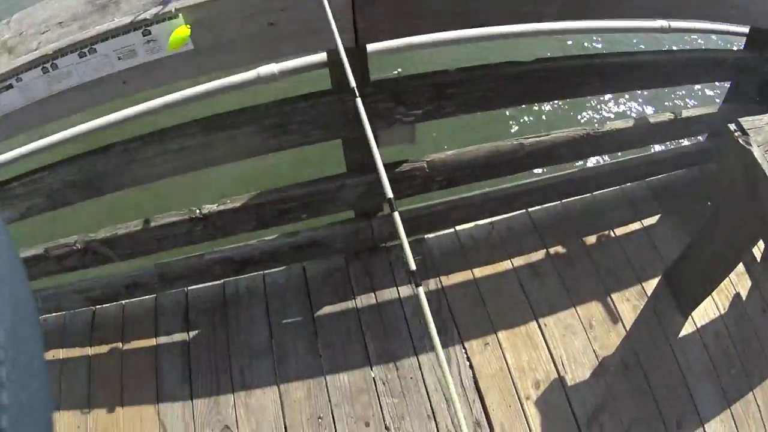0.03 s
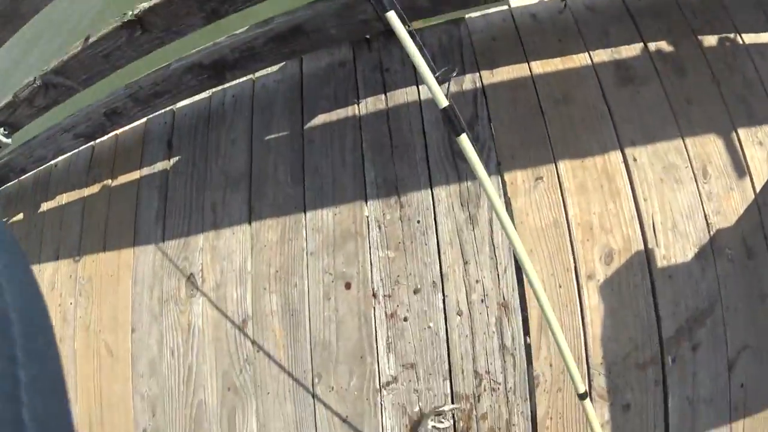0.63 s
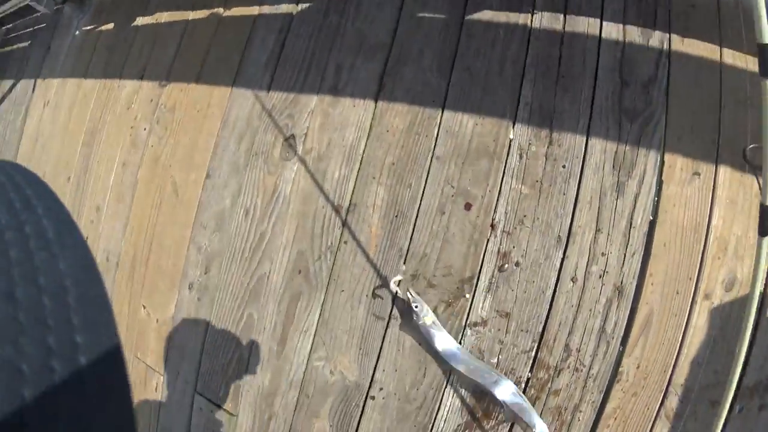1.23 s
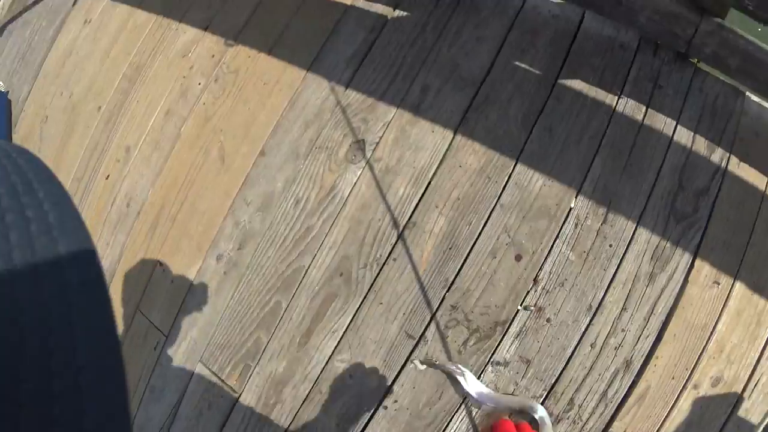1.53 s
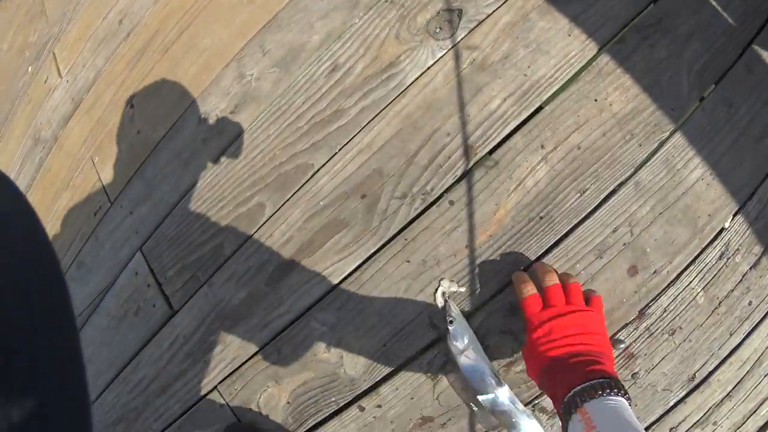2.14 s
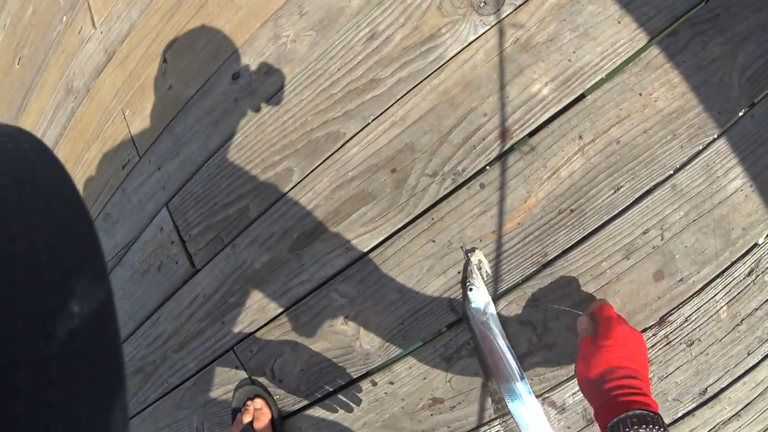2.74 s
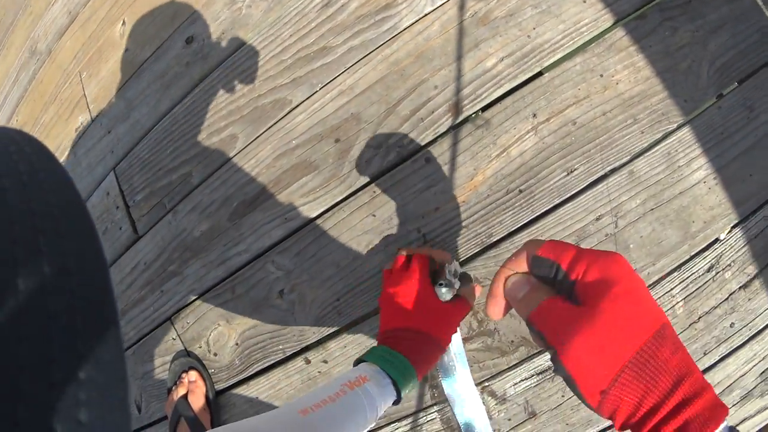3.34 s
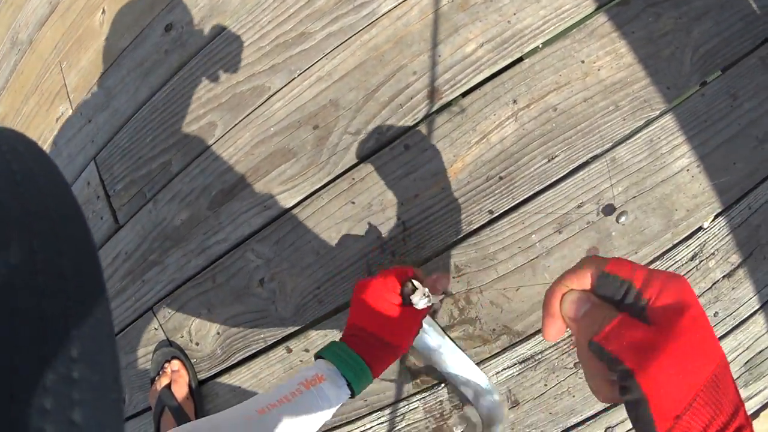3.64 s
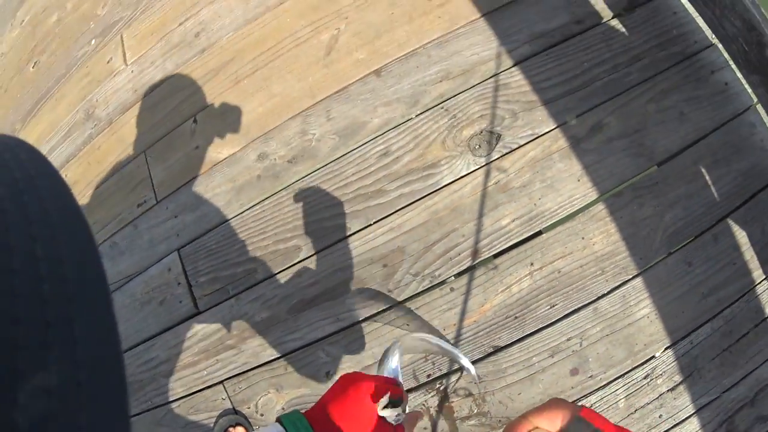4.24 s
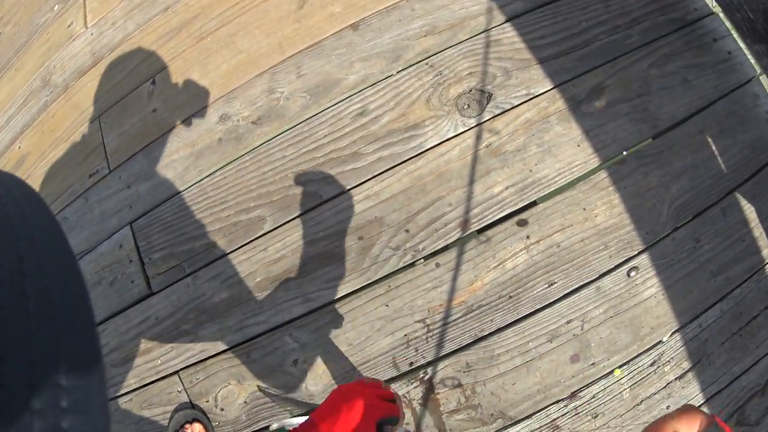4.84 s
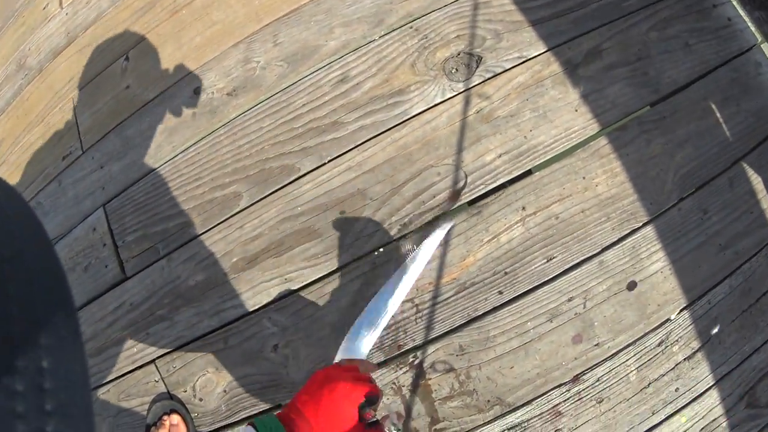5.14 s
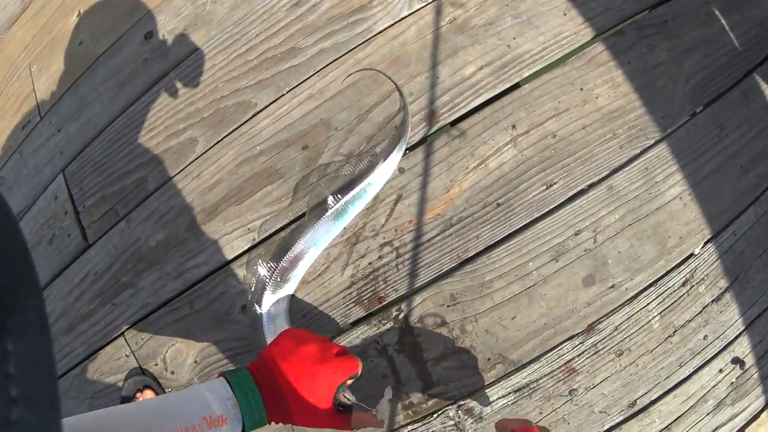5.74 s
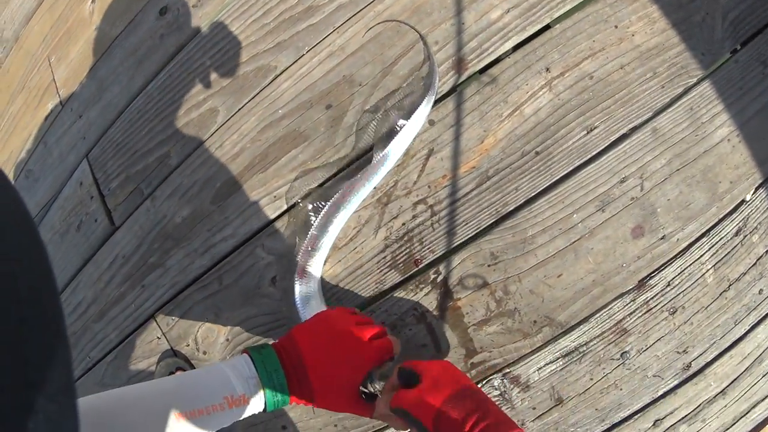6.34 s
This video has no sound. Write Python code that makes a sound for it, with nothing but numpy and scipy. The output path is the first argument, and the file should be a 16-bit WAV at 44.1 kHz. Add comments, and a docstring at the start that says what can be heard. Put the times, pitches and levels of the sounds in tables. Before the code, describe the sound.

On a wooden pier, a fishing rod scrapes the rail and clacks with a short, hollow ring while a wet fish slides and knocks on the planks. Feet thud on the boards, then metal pliers click at the hook among more slaps, small wet ticks and a few tackle clacks. Everything is close to a body-worn microphone, with shuffling clothes, light wind rumble and a soft wash of sea underneath.

```python
"""On a wooden pier, a long fish is landed close to a body-worn microphone. The wet fish slides, ticks and slaps
on the planks, and feet thud: each blow bends a board. The wearer's body bumps deeply as it moves. Rod and
tackle scrape the rail and clack, and the microphone's case rings briefly and hollowly; pliers click at the
hook. Underneath, clothes shuffle, light wind buffets the microphone and the sea washes."""
import sys
import numpy as np
from scipy import signal
from scipy.fft import rfft, irfft
from scipy.io import wavfile
from scipy.ndimage import uniform_filter1d

SR = 44100
rng = np.random.default_rng(int(sys.argv[2]) if len(sys.argv) > 2 else 0)


def file_out(sig):
    """Save sig as 16-bit WAV at sys.argv[1]."""
    # one column per channel
    cols = np.atleast_2d(sig).T
    # limit, then scale
    lim = np.clip(cols, -1, 1)
    pcm = np.round(lim * 32767).astype(np.int16)
    wavfile.write(sys.argv[1], SR, pcm)


N = 290178
TOP_HZ = 11130  # upper limit of the treble


# Hollow knocks on the planks: t/s, peak level/dB, f/Hz
KNOCKS = [(0.1002, -31, 490), (0.2447, -17.5, 503), (0.2858, -24.5, 573), (0.3649, -27, 523),
          (0.425, -24.5, 365), (0.48, -25.5, 537), (0.499, -20, 540), (0.6033, -25.5, 567),
          (0.7027, -27, 670), (0.907, -23.5, 546), (0.996, -28.5, 556), (1.1274, -27.5, 510),
          (1.8468, -25, 620), (1.8883, -30, 580), (1.9885, -25, 670), (2.0192, -24.5, 620),
          (2.1089, -29, 513), (2.2802, -27.5, 643), (2.4735, -19.5, 590), (2.4811, -21, 563),
          (2.8282, -26.5, 497), (3.2429, -27, 510), (3.4166, -28, 523), (3.633, -29, 520),
          (3.7044, -21.5, 600), (3.7635, -26.5, 650), (4.204, -34, 700), (5.4479, -30, 513),
          (5.4897, -26.5, 613), (5.596, -31.5, 490), (5.654, -31.5, 630), (5.9378, -29.5, 533),
          (6.0565, -28, 610)]
# Heavy, soft blows of feet and fish, and deep bumps of the wearer's body moving: t/s, peak level/dB, f/Hz
THUDS = [(0.241, -34.5, 185), (0.356, -28, 27.2), (0.4982, -28.5, 143), (0.721, -28.5, 145),
         (0.7896, -29.5, 229), (1.432, -37.5, 94), (1.8484, -24.5, 160), (1.988, -26.5, 152),
         (2.022, -33.5, 156), (2.2685, -30.5, 88), (2.2753, -21, 154), (2.446, -29, 31), (2.451, -27.5, 70),
         (2.4714, -20.5, 112), (2.4751, -15.5, 193), (3.712, -25, 258), (4.2248, -28, 138),
         (5.1188, -26.5, 288), (6.532, -28, 278)]

def planks():
    """Light knocks and heavy thuds bend the boards, and the wearer's body bumps deeply as it moves; the harder
    the knock, the more it cracks."""
    out = np.zeros((2, N))
    for s, db, hz in KNOCKS + fish_patter():
        crack_db = -7 + 0.81 * (db + 16)
        knock = bend(hz, rise_cycles=1.58, glide=0.17, grit_db=crack_db,
                     hum_hz=0.66 * hz, hum_db=-4.5, hum_t60=0.055)
        add(out, s, gain_of(db) * panned(-1.5) * knock)
    for s, db, hz in THUDS:
        thud = bend(hz, rise_cycles=0.99, glide=0.58, grit_db=-17.5, hum_hz=hz, hum_db=-5, hum_t60=0.12)
        add(out, s, gain_of(db) * panned(-1) * thud)
    return out


def bend(hz, rise_cycles, glide, grit_db, hum_hz, hum_db, hum_t60):
    """In a bending plank high notes arrive first, so the pulse falls in pitch; then the deck hums."""
    t = np.arange(8000) / SR
    age = t * hz / rise_cycles  # 1 at the peak
    swell = (age * np.exp(1 - age)) ** 3
    pitch = hz * (1 + glide * (np.exp(1 - age) - 1) / (np.e - 1))
    grit = gain_of(grit_db) * noise_band(len(t), 1300, width_hz=800, apart=0.25)
    tone = np.sin(2 * np.pi * (np.cumsum(pitch) / SR + rng.uniform(-0.1, 0.15)))
    hum = noise_band(len(t), hum_hz, width_hz=hz / 2, apart=0.65)
    return swell * (tone + grit) + hum * gain_of(hum_db) * fade(t, hum_t60) * (1 - np.exp(-age))


def fish_patter(db=-38, hz=600):
    """The shifting fish knocks faintly at random; gives rows like those of KNOCKS."""
    return [(s, db, hz * 2 ** (0.13 * rng.standard_normal())) for s in busy_times(per_s=9, eagerness=3)]


# Tone of rubbing on wood: f/Hz, level/dB
RUB_TONE = [(180, -24), (300, -16.5), (536, -9), (578, -10), (663, -23.5), (860, -12.5), (1380, 5),
            (1930, 2), (3340, -3), (3660, -4.5), (4600, 3.5), (7060, -9.5), (9870, -9.5), (11000, -12),
            (11500, -55), (15000, -60), (22000, -120)]

def sliding(level_db=-1, catches_per_s=700, patchy_db=2.5, smooth_above_db=-43.5):
    """Fish, line and gloves rub: a fine hiss with tiny catches that come in clumps."""
    clumps = gain_of(6 * np.tanh(wobble(N, 700)))
    catches = clumps * (rng.random(N) < catches_per_s / SR)
    catches *= gain_of(4 * np.minimum(rng.exponential(1, N), 3))
    rub_db, _ = strokes(np.arange(N) / SR)
    slowness = 1 / (1 + gain_of(rub_db - smooth_above_db) ** 2)  # a fast slide smooths the catches out
    hiss = stereo_noise(N, 0.36)
    grains = unit_level(catches * stereo_noise(N, 0.75))
    friction = unit_level(hiss + 0.62 * slowness * grains)
    hz, t, spectrum = signal.stft(friction, SR, nperseg=256, noverlap=192)
    rub_db, brightness = strokes(t)
    octaves = np.log2(np.clip(hz, 1200, 11000) / 3500)[:, None]
    tone = gain_of(at_pitch(RUB_TONE, hz)[:, None] + octaves * brightness)
    tone /= np.sqrt(np.mean(tone ** 2, 0))
    spectrum *= tone * gain_of(rub_db + level_db + patchy_db * patches(tone.shape, 12, 7))
    return signal.istft(spectrum, SR, nperseg=256, noverlap=192)[1][:, :N]


# Single slides: fastest at t/s, level/dB, rise/s, fall/s, brightness/(dB per octave)
STROKES = [(0.0, -36, .01, 0.039, -5.5), (0.5, -31.5, 0.082, 0.051, -2.5), (0.63, -26, 0.11, 0.1, 3.3),
           (1.18, -42, 0.15, 0.071, 2.5), (1.87, -52, 0.033, 0.042, 2), (2.05, -38.5, 0.024, 0.035, -6),
           (2.203, -35, 0.015, 0.025, 0), (2.51, -42, 0.03, 0.1, 5), (2.33, -48, 0.027, 0.093, -4),
           (3.4, -43, 0.028, 0.077, -1), (3.61, -38, 0.023, 0.031, 1.5), (3.905, -36, 0.021, .02, 2.5),
           (4.34, -40.5, 0.021, .03, 1), (4.47, -36.5, 0.011, 0.017, -1),
           (6.476, -28.5, 0.0078, 0.041, 0.2), (6.57, -28, 0.033, .05, 0)]
# How busy hands and fish are: t/s, level/dB
HANDLING = [(0, -50), (0.3, -47), (0.95, -45.5), (2.1, -46.5), (2.6, -48), (2.75, -52.5), (3.3, -51.5),
            (3.55, -46.5), (4.1, -48.5), (4.4, -44), (4.7, -47.5), (5.13, -47), (5.27, -52), (6.58, -55)]

def strokes(t):
    """Level and brightness of the rubbing: each slide swells and fades over the soft handling."""
    power = gain_of(at_time(HANDLING, t)) ** 2
    tilt = -2 * power  # handling is duller by 2 dB per octave
    for s, db, rise_s, fall_s, brightness in STROKES:
        away = abs(t - s) / np.where(t < s, rise_s, fall_s)
        stroke = (gain_of(db) * np.exp(-away ** 1.63)) ** 2  # between a point and a bell in shape
        power += stroke
        tilt += stroke * brightness
    return 10 * np.log10(power), tilt / power


def busy_times(per_s, eagerness, busy_db=-46):
    """Random moments, more of them when the handling is busy; per_s is the rate at busy_db."""
    step_s = 0.001
    t = np.arange(0, N / SR, step_s)
    rate = per_s * gain_of(eagerness * (at_time(HANDLING, t) - busy_db))
    return t[rng.random(len(t)) < step_s * rate]


# The clearest ticks of fish skin on the boards: t/s, treble level/dB
WET_TICKS = [(0.8936, -39), (0.924, -33.5), (0.9324, -38), (0.9685, -36), (1.035, -34.5), (1.2423, -38),
             (1.2734, -36.5), (1.4065, -39), (1.6904, -35), (1.7034, -37.5), (1.8358, -39.5), (2.3497, -41),
             (3.7626, -31.5), (3.9148, -29), (4.211, -38), (4.699, -41.5), (5.0274, -38), (5.7996, -39.5)]

def wet_ticks():
    """Wet skin ticks as it moves: a few clear, bright ticks among many faint ones."""
    out = np.zeros((2, N))
    faint = [(s, at_time(HANDLING, s) - 3.5 + 3.5 * rng.standard_normal())
             for s in busy_times(per_s=24, eagerness=2.6)]
    for s, db in WET_TICKS + faint:
        hz = min(9280 * 2 ** (0.19 * rng.standard_normal()), TOP_HZ)
        add_contact(out, s, (db - 12.5, db - 6, db), hz, t60=0.015, scuff_s=0.00036)
    return out


# Hard blows that set the microphone's case ringing: t/s, level/dB, centre f/Hz, snap/dB added to level, ring
# length factor
CLACKS = [(0.8088, -19, 2600, -28, 2.7), (0.8221, -20.5, 2220, -23, 0.91), (0.8757, -22.5, 1540, -16, 0.84),
          (0.9393, -23, 1760, -8, 0.95), (1.008, -31.5, 1440, -19, 1.1), (1.662, -26, 1930, -46, 0.71),
          (3.518, -18.5, 1670, -10, 0.76), (3.598, -25, 1330, -5.5, 0.47), (4.1258, -31, 1410, -24, 0.45),
          (5.1093, -25, 1900, 0, 1.2), (5.7707, -16, 1790, -22, 1.18), (5.8639, -26.5, 1790, -25, 0.73),
          (5.8921, -32, 1680, -21, 1.1), (6.524, -28, 1500, -17, 3.2)]
# The notes the microphone's case rings with after those blows: f/Hz, relative level/dB, fade time/s before the
# length factor
CLACK_NOTES = [(1213, -4, 0.068), (1252, 3, 0.095), (1421, 3.5, 0.061), (1505, 3.5, 0.029),
               (1724, 5.5, 0.032), (2110, -8, 0.013), (2046, 3.5, 0.058), (2477, 16, 0.013),
               (2630, 1, 0.0091), (3100, 2.5, 0.024), (4200, 22, 0.016)]

def tackle_clacks(ring_db=-1, reach_octaves=0.34, rise_s=0.000085, detune=0.018):
    """Rod and tackle clack: each blow gives a dry snap and sets the microphone's case ringing shortly and
    hollowly near the blow's own pitch."""
    out, t = np.zeros((2, N)), np.arange(6000) / SR
    snap_band = signal.butter(2, (900, 5500), "band", fs=SR, output="sos")
    snap = signal.sosfilt(snap_band, snap_pulse())
    hz, note_db, t60 = np.transpose(CLACK_NOTES)[:, :, None]
    for s, db, centre_hz, snap_db, length in CLACKS:
        spot, mistune = rng.standard_normal((2, len(hz), 1))
        nearness = np.exp(-0.5 * (np.log2(hz / centre_hz) / reach_octaves) ** 2)
        strength = nearness * gain_of(note_db + 4 * spot)  # each spot favours other notes
        phase = rng.uniform(0, 2 * np.pi, hz.shape) + 0.47 * rng.standard_normal((2, len(hz), 1))
        notes = np.sin(2 * np.pi * hz * (1 + detune * mistune) * t + phase)
        ring = (strength * fade(t, t60 * length) * notes).sum(1) * (1 - np.exp(-t / rise_s))
        add(out, s, hit_level(ring, db + ring_db))
        add(out, s, hit_level(crack(t, snap, t60=0.037, scuff_s=rise_s), db + snap_db))
    return out


# Short scrapes on wood: t/s, middle level/dB, hold/s, body/dB and treble/dB added to level, ring f/Hz
SCRAPES = [(0.1442, -19.5, 0.0078, -7.5, -13, 4100), (0.157, -25, 0.0052, -1, -20, 4230),
           (0.18, -27.5, 0.002, -10, -19, 4300), (0.291, -38, 0.0032, 5.5, -5, 2950),
           (0.3092, -25, 0.0031, 0, -28, 4180), (0.347, -33.5, 0.0061, 0, -18, 3950),
           (0.3844, -27.5, 0.0029, -11, -20, 3800), (0.399, -28.5, 0.0029, -6, -19, 3440),
           (0.414, -29, 0.0021, 3, -16, 2840), (0.474, -37.5, .022, 2, -20, 2400),
           (0.603, -26.5, 0.028, -4, -26, 3500), (0.719, -37, 0.021, 7, -18, 2620),
           (0.788, -31.5, 0.0025, 3.5, -7, 2560), (0.8085, -24, 0.0055, -10, -5, 2610),
           (0.821, -25, 0.025, 0, -12, 2580), (1.651, -46, .012, 12, -16, 1960),
           (3.551, -29.5, 0.0038, -2, -7, 2700), (3.699, -34.5, .022, 3.5, -8.5, 4570),
           (3.7983, -28, 0.001, -25, -12, 5230), (4.307, -31, 0.0047, -12, -21, 4630),
           (6.51, -24.5, 0.016, -0.5, -0.5, 4730)]

def scrapes(rise_s=0.00023, band_t60s=(0.078, 0.043, 0.036)):
    """A hard edge bites, judders over the grain for a moment, and lets the wood ring out."""
    out, t, snap = np.zeros((2, N)), np.arange(6000) / SR, snap_pulse()
    for s, db, hold_s, body_db, treble_db, hz in SCRAPES:
        judder = gain_of(3 * np.tanh(wobble(len(t), 50)))
        for band, band_db in enumerate((db + body_db, db, db + treble_db)):
            shape = (1 - np.exp(-t / rise_s)) * fade(np.maximum(t - hold_s, 0), band_t60s[band])
            rasp = signal.fftconvolve(stereo_noise(len(t), 0.42) * judder * shape, snap[None])
            add(out, s, ringing_band(rasp, band, hz, band_db))
    return out * panned(-0.5)


# Metal clicks: t/s, middle level/dB, body/dB and treble/dB added to level, middle fade/s, ring f/Hz
CLICKS = [(0.1232, -28.5, -1, -3.5, 0.075, 4570), (0.1647, -30, -6, -1.5, 0.038, 4430),
          (0.8682, -38, 2, 4.5, 0.049, 2630), (0.9566, -39.5, -9, 5, 0.014, 4870),
          (1.0903, -31.5, -4, 1.5, .012, 10700), (1.161, -40, -10, -2, .035, 4650),
          (1.221, -27.5, -11, -20, 0.016, 4700), (1.3655, -31.5, -6.5, -7.5, 0.035, 3600),
          (1.4982, -37, -3.5, -15, .028, 4520), (1.6238, -37.5, -4, -11, 0.034, 6300),
          (1.8013, -28, -3, -8.5, 0.023, 3730), (2.0045, -29.5, -32, -16, 0.0076, 4500),
          (2.4827, -30, -0.5, -15, 0.024, 3300), (3.592, -33, 2.5, -3, 0.048, 3640),
          (3.598, -32, -13, -14, 0.016, 4130), (3.611, -35, -5, 2.5, 0.013, 10700),
          (3.8125, -34, -27, -21, .013, 4730), (3.9947, -35, -15, -11, 0.041, 3490),
          (4.0038, -34, -9, 0.5, 0.049, 4720), (4.0326, -33, -14, -2, 0.026, 10600),
          (4.1182, -31.5, -4, -14, 0.018, 3100), (4.1236, -21.5, -12.5, -9, 0.03, 5050),
          (4.1456, -33.5, -17, -4, 0.034, 4630), (4.2392, -34, -13, -5.5, 0.018, 4070),
          (4.557, -23, -19, -16, 0.019, 6100), (4.5722, -33, -2, -4, 0.039, 3150),
          (4.7672, -42, 3, -3, 0.041, 4900), (4.8, -36.5, 0, 0.5, .06, 4930),
          (4.9221, -33.5, -4.5, 1.5, .023, 4730), (5.0246, -43.5, 0, 2, 0.023, 3000),
          (5.1098, -25.5, -2, -4.5, 0.026, 3370), (5.7555, -43, -3, 1, 0.01, 3880),
          (5.7691, -30, 7, -29, 0.043, 3970), (5.863, -44, 13.5, -20, 0.033, 2900),
          (6.495, -33, -9, -1, 0.018, 5200)]

def plier_clicks():
    """Pliers and hook catch and snap, each click with its own share of body and treble."""
    out = np.zeros((2, N))
    for s, db, body_db, treble_db, t60, hz in CLICKS:
        add_contact(out, s, (db + body_db, db, db + treble_db), hz, t60, scuff_s=0.0005)
    return out


def add_contact(mix, s, levels_db, hz, t60, scuff_s):
    """Adds a small, sharp contact at time s; its body rings longer than its treble."""
    t, snap = np.arange(-512, 4096) / SR, snap_pulse()
    for band, length in enumerate((2.17, 1, 0.84)):
        sound = crack(t, snap, t60 * length, scuff_s)
        add(mix, s + t[0], ringing_band(sound, band, hz, levels_db[band]))


def crack(t, snap, t60, scuff_s):
    """A scuff builds up, catches at t = 0, rings out and scatters faintly off deck and rail."""
    after = np.maximum(t, 0)
    scuff = np.exp(np.minimum(t, 0) / scuff_s)
    catch = gain_of(3) * np.exp(-after / 0.0012)
    scatter = gain_of(-28) * fade(after, 0.1)
    shape = np.where(t < 0, scuff, catch + fade(after, t60) + scatter)
    return signal.fftconvolve(stereo_noise(len(t), 0.19) * shape, snap[None])[:, :len(t)]


# Tone of a click: f/Hz, level/dB
SNAP_TONE = [(500, -11), (900, -17.5), (1300, -6.5), (1700, -1), (2100, -4), (2700, -3), (3400, -4.5),
             (4500, 0.5), (5200, -1), (6100, 0.5), (7000, -10), (8200, -5.5), (9300, -5), (11000, -4.5)]

def snap_pulse():
    """The quickest pulse that has the tone of a click (a minimum-phase filter)."""
    hz = abs(np.fft.fftfreq(1024, 1 / SR))
    log_gain = np.log(gain_of(at_pitch(SNAP_TONE, hz)))
    return np.fft.ifft(np.exp(np.conj(signal.hilbert(log_gain)))).real


# Borders of the body, middle and treble bands: f/Hz
BAND_EDGES = [520, 2600, 6500, 11300]

def ringing_band(sound, band, hz, db):
    """Body (0), middle (1) or treble (2) of a contact, with one note of the part that was touched."""
    passband = signal.butter(3, BAND_EDGES[band:band + 2], "band", fs=SR, output="sos")
    ring = gain_of(6) * resonate(sound, hz, width_hz=330)
    return hit_level(signal.sosfilt(passband, sound + ring), db)


# Loudness of the shuffling: t/s, level/dB
SHUFFLE_LEVEL = [(0.0, -48.5), (0.38, -45.5), (1.5, -50), (1.96, -51), (3.06, -55.5), (3.63, -50),
                 (6.41, -52.5), (6.58, -54)]
# Its dull tone: f/Hz, level/dB
SHUFFLE_TONE = [(60, -4), (110, -1.5), (170, 0), (260, -2.5), (400, -4.5), (600, -9), (800, -12),
                (1200, -37)]

def shuffle():
    """Clothes and deck shift with a low, dull noise."""
    noise = with_tone(stereo_noise(N, 0.18), SHUFFLE_TONE + [(4000, -66)])
    return noise * gain_of(at_time(SHUFFLE_LEVEL, np.arange(N) / SR))


# Rise and fall of the wind: t/s, level/dB before the boost
WIND_LEVEL = [(0.0, -52), (0.29, -44), (0.42, -54), (2.09, -56.5), (2.44, -51), (2.91, -62.5), (4.0, -50.5),
              (4.84, -52.5), (5.39, -75), (6.58, -63)]
# Its deep tone: f/Hz, level/dB
WIND_TONE = [(12, -8.5), (28, 1.5), (45, 1), (70, -25), (120, -13), (300, -65)]

def wind(gust_db=4, boost_db=5.5):
    """Gusts buffet the microphone and make it rumble."""
    gusts = gain_of(gust_db * np.tanh(wobble(N, 3000)))
    rumble = with_tone(stereo_noise(N, 0.14) * gusts, WIND_TONE + [(2000, -90)])
    return rumble * gain_of(at_time(WIND_LEVEL, np.arange(N) / SR) + boost_db)


# Tone of the sea: f/Hz, level/dB
SEA_TONE = [(410, -4), (700, -11), (834, -10), (885, -11), (1170, -1.5), (1520, -7.5), (1630, -1.5),
            (1720, -6.5), (2230, -9), (3360, -22.5), (5250, -25), (6790, -26), (10500, -27), (11100, -34),
            (11500, -57), (15000, -79), (22000, -120)]
# How alike its two sides are: f/Hz, likeness (1 = the same)
SEA_LIKENESS = [(60, 0.98), (130, 0.86), (270, 0.65), (580, 0.053), (1220, 0.73), (2600, 0.093),
                (5520, 0.13), (11700, 0.34)]
# Which way it leans: f/Hz, left minus right/dB
SEA_SIDE = [(60, -0.5), (170, -2.0), (500, 1.5), (1420, 0.3), (4090, 4), (11700, -0.5)]

def sea(level_db=-48, patchy_db=2.5):
    """Water under the pier makes a steady wash with soft, drifting patches."""
    hz, _, (left, other) = signal.stft(rng.standard_normal((2, N)), SR, nperseg=1024, noverlap=768)
    likeness = at_pitch(SEA_LIKENESS, hz)[:, None]
    right = likeness * left + np.sqrt(1 - likeness ** 2) * other
    lean = gain_of(at_pitch(SEA_SIDE, hz)[:, None] / 2)
    tone = gain_of(at_pitch(SEA_TONE, hz)[:, None] + patchy_db * patches(left.shape, 20, 20))
    spectrum = np.array([left * lean, right / lean]) * tone
    wash = signal.istft(spectrum, SR, nperseg=1024, noverlap=768)[1][:, :N]
    return gain_of(level_db) * unit_level(wash)


def gain_of(db):
    """Turns decibels into a factor."""
    return 10 ** (np.asarray(db) / 20)


def fade(t, t60):
    """Dies away by 60 dB in t60 seconds, the fade time."""
    return gain_of(-60 * t / t60)


def unit_level(x):
    """Scales to an average (rms) level of 1."""
    return x / np.sqrt(np.mean(x ** 2) + 1e-20)


def hit_level(x, db):
    """Gives a hit as much energy as 10 ms of sound at this level."""
    return x * gain_of(db) / np.sqrt(np.mean(x ** 2) * x.shape[-1] / (SR / 100) + 1e-20)


def at_pitch(rows, hz):
    """Looks up a table of (f/Hz, value), with octaves evenly spaced."""
    f, value = np.transpose(rows)
    return np.interp(np.log(hz + 1), np.log(f + 1), value)


def at_time(rows, t):
    """Looks up a table of (t/s, value)."""
    return np.interp(t, *np.transpose(rows))


def add(mix, s, sound):
    """Adds a sound to the stereo mix at time s."""
    part = mix[:, max(round(s * SR), 0):][:, :sound.shape[-1]]
    part += sound[..., :part.shape[-1]]


def panned(side_db):
    """Left and right gains; below zero leans right."""
    return gain_of([[side_db / 2], [-side_db / 2]])


def stereo_noise(size, apart):
    """Left and right share one noise; apart sets how much of their own they add."""
    common, left, right = rng.standard_normal((3, size))
    return unit_level(common + apart * np.array([left, right]))


def resonate(x, hz, width_hz):
    """Lets through only the sound near one pitch."""
    return signal.lfilter(*signal.iirpeak(hz, hz / width_hz, fs=SR), x)


def noise_band(size, hz, width_hz, apart):
    """Stereo noise narrowed twice around one pitch."""
    once = resonate(stereo_noise(size, apart), hz, width_hz)
    return unit_level(resonate(once, hz, width_hz))


def with_tone(x, rows):
    """Filters by a tone table and scales to level 1."""
    gain = gain_of(at_pitch(rows, np.fft.rfftfreq(N, 1 / SR)))
    return unit_level(irfft(rfft(x) * gain, N))


def wobble(size, span):
    """A random curve, smoothed over span samples."""
    return unit_level(uniform_filter1d(rng.standard_normal(size), span))


def patches(shape, pitch_steps, time_steps):
    """Random hills and dips, smoothed over pitch and time."""
    across_pitch = uniform_filter1d(rng.standard_normal(shape), pitch_steps, axis=0)
    return unit_level(uniform_filter1d(across_pitch, time_steps, axis=1))


def scene():
    """Everything sounds close by, in the open air."""
    background = sea() + wind() + shuffle()
    return background + sliding() + scrapes() + plier_clicks() + tackle_clacks() + planks() + wet_ticks()


# Notes of the case around the microphone: f/Hz, width/Hz, added level/dB
CASE_NOTES = [(1340, 63, -9), (2254, 57, -6.5), (2560, 13, -16), (3360, 330, -6), (4060, 60, -13),
              (4450, 100, -8), (9260, 120, -2)]
# How late the left microphone opening hears: f/Hz, lag/radians
LEFT_LAG = [(60, 0.069), (250, 0.23), (520, 0.93), (1400, 0.056), (2300, 0.92), (3700, 0.14), (5200, 0.77),
            (8000, 0.62), (11000, 0.43)]
# How the two openings differ in tone: f/Hz, left minus right/dB
MIC_SIDE = [(60, -1), (150, -1.5), (500, -0.5), (1200, -2.5), (2300, 3), (4500, 1.8), (9000, -0.9)]

def record(dry):
    """The case rings, the left side hears slightly late, and the highest treble is cut off."""
    cased = dry + sum(gain_of(db) * resonate(dry, hz, width) for hz, width, db in CASE_NOTES)
    hz = np.fft.rfftfreq(N, 1 / SR)
    delay = np.exp(-1j * at_pitch(LEFT_LAG, hz))
    lean = gain_of(at_pitch(MIC_SIDE, hz) / 2)
    heard = irfft(rfft(cased) * np.array([lean * delay, 1 / lean]), N)
    treble_cut = signal.firwin(201, TOP_HZ, window=("kaiser", 8), fs=SR)
    return signal.oaconvolve(heard, treble_cut[None], "same")


dry = scene()
out = record(dry)
file_out(out)
```